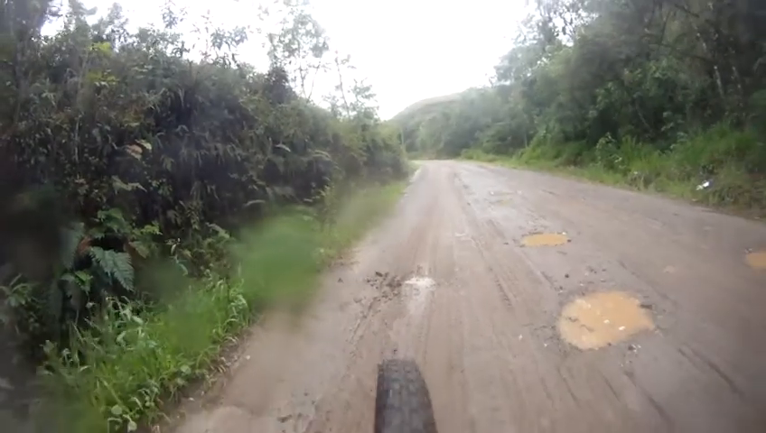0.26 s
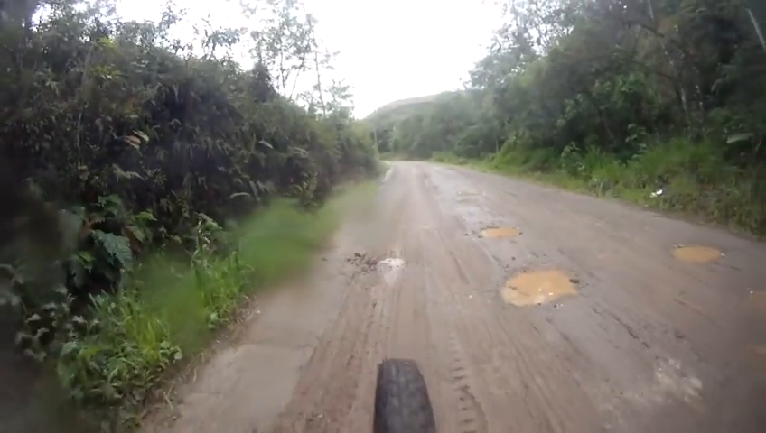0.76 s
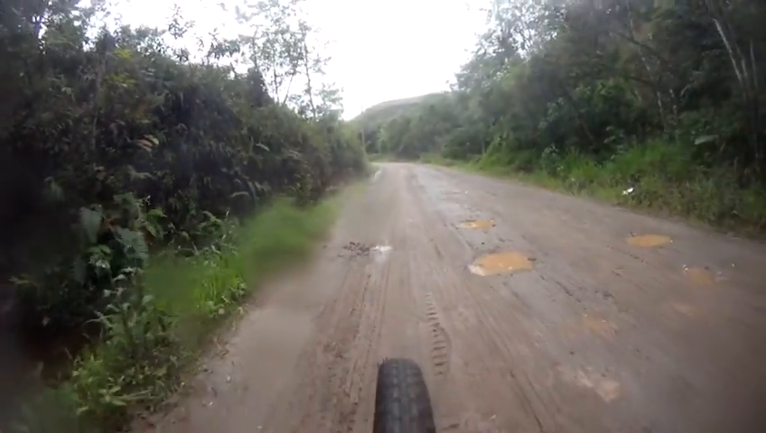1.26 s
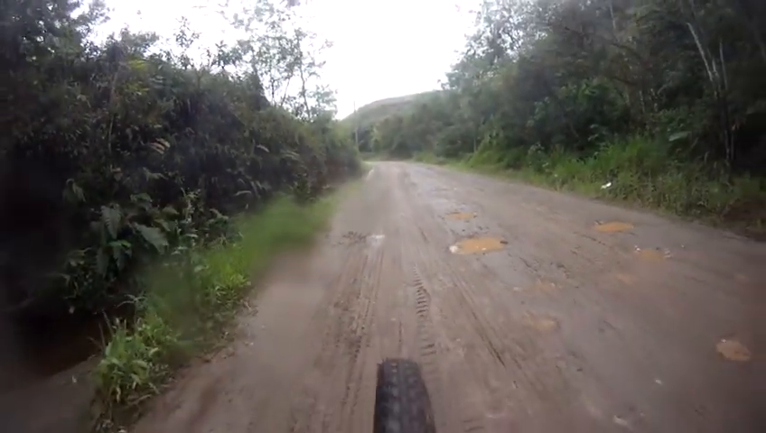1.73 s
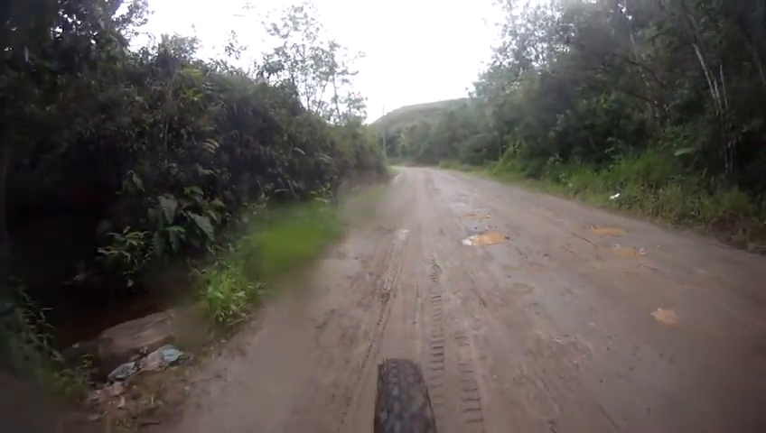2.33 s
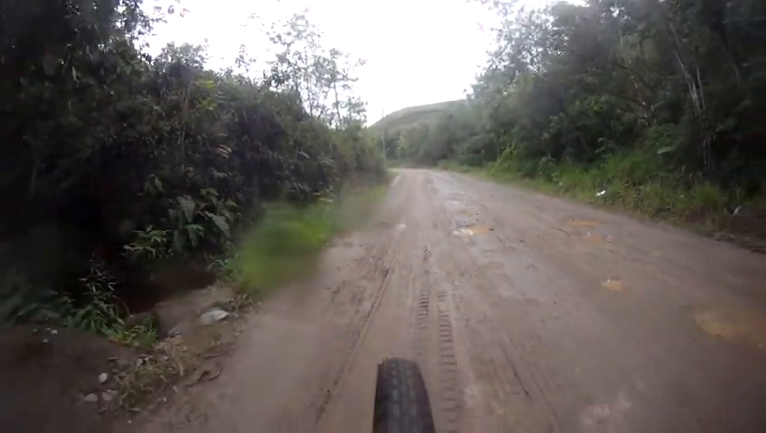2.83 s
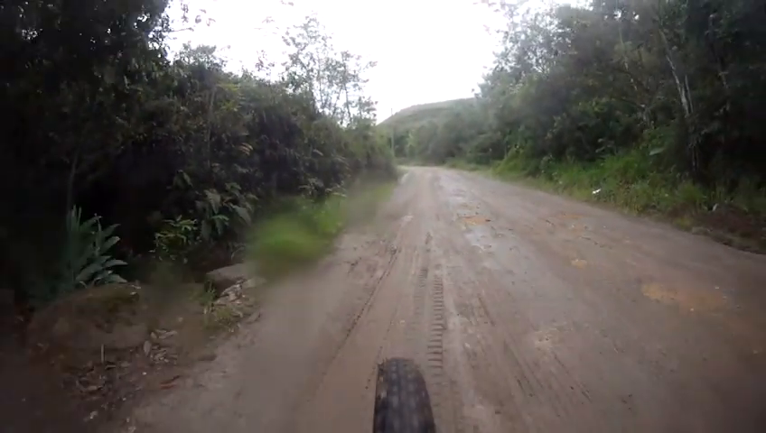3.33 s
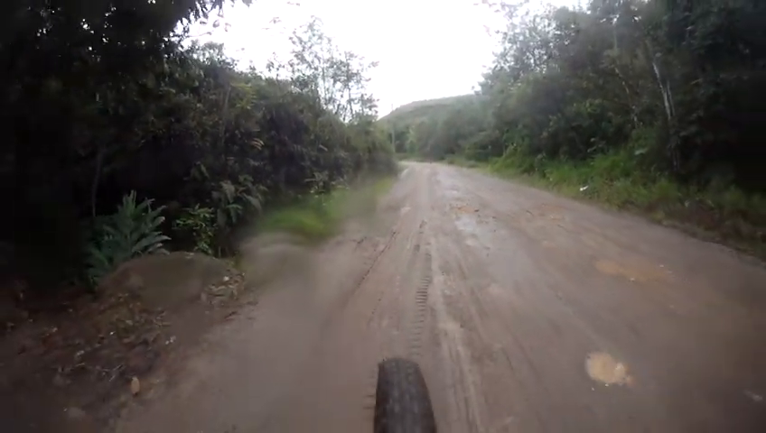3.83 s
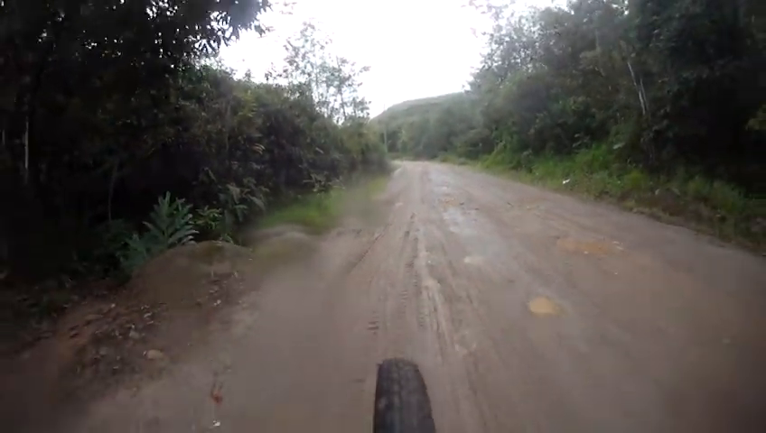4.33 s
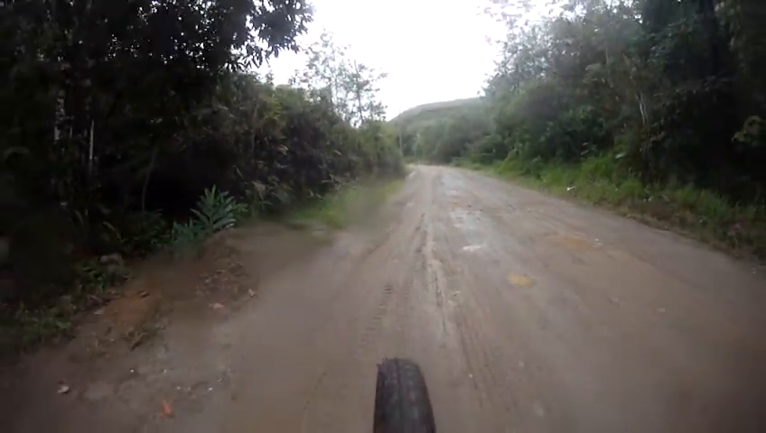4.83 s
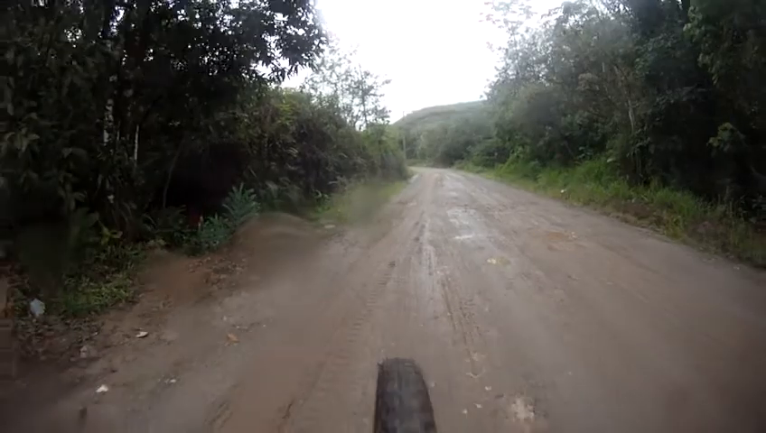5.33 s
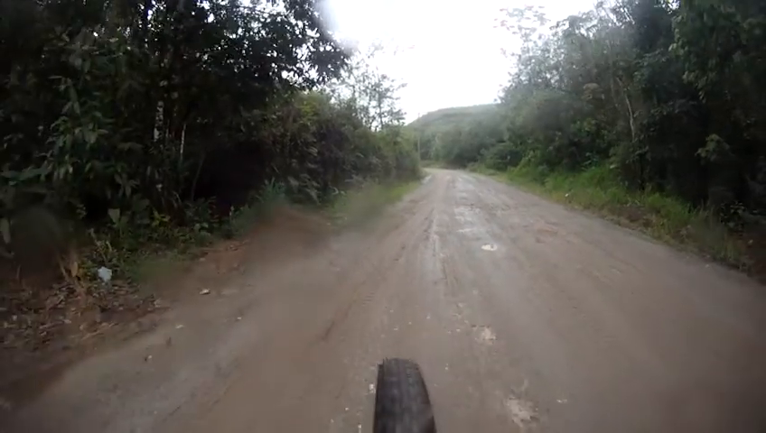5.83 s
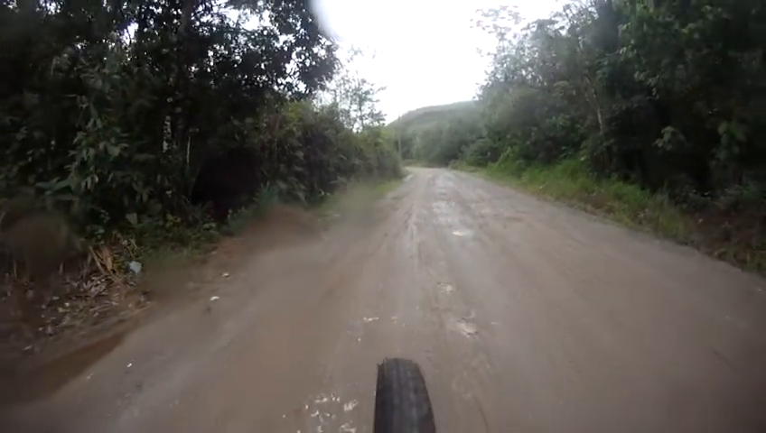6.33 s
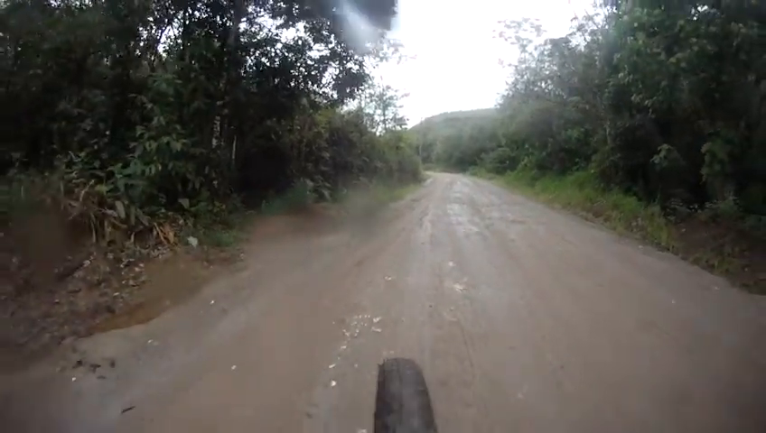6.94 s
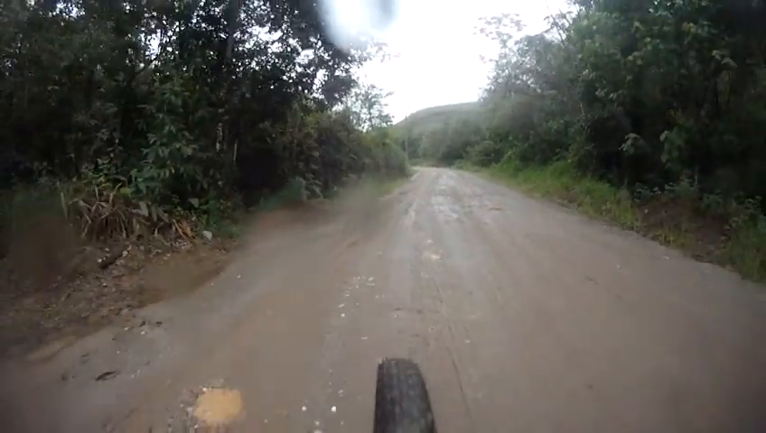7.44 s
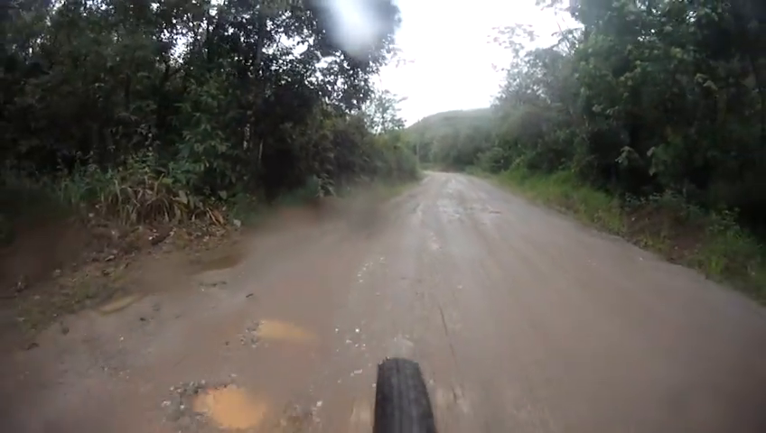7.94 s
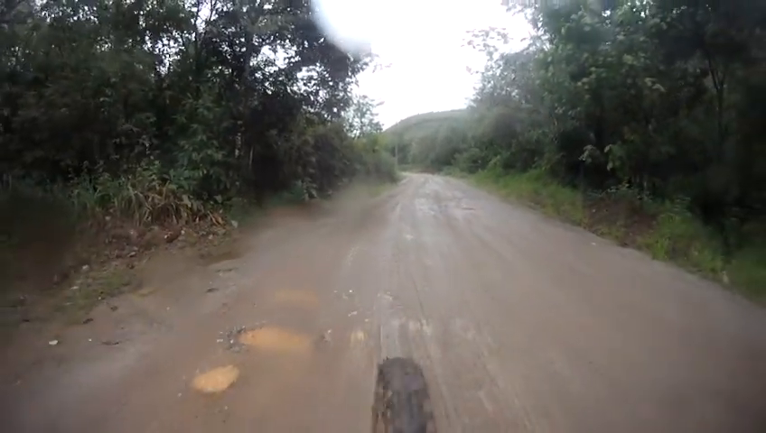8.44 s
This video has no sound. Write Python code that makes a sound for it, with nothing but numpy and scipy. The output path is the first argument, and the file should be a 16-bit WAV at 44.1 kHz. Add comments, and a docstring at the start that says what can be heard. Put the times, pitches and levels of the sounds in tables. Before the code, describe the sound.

Slowed, dull-toned mountain bike ride heard from the frame: deep rumbling, faint gritty hiss, ticking hub, and bumps that grow denser and louder.

```python
"""A low, lumpy rumble runs throughout: a coasting mountain bike on a wet dirt road, slowed down, heard at the frame.
The rumble is noise in low fork and sway resonances; grit hisses and the frame buzzes under pebble hits.
Freewheel ticks, wheel-driven and slightly uneven, and bumps ring the tubes; a loose part clicks and chatters.
The frame groans once, as noise in narrow partials. The slowed sound runs at 12000 samples a second, each
one held in steps, which mirrors the low sound into the treble."""
import sys
import numpy as np
from scipy import signal
from scipy.fft import rfft, irfft
from scipy.io import wavfile
from scipy.ndimage import uniform_filter1d

SR = 44100
rng = np.random.default_rng(int(sys.argv[2]) if len(sys.argv) > 2 else 0)


def pcm_store(signal):
    """Save signal as 16-bit PCM."""
    levels = np.round(np.clip(np.atleast_2d(signal), -1, 1) * 32767)
    wavfile.write(sys.argv[1], SR, levels.astype(np.int16).T)


N = 382788

# the road under the tyres, before chance swings:
# (time [s], fork shake [dB], sway [dB], upper fork ring [dB], frame buzz [dB])
ROAD_SHAKE = [(0, -49, -43, -54, -52), (0.2, -39.5, -45, -48.5, -52.5), (0.38, -45, -53, -54, -49),
              (0.55, -46.5, -45, -48, -48), (0.68, -38.0, -53, -48, -48.5), (0.8, -44.5, -48, -54, -56.5),
              (1.25, -40.5, -45, -48.5, -51.0), (1.65, -45.5, -46.5, -49, -53.5),
              (2.0, -38.5, -44.5, -52.5, -53.5), (2.4, -41, -44, -50.5, -50), (2.7, -44, -48.5, -47.5, -52),
              (3.05, -36, -39.5, -50.0, -45), (3.45, -36, -47.5, -47.5, -50.5),
              (3.8, -40, -40.5, -53.5, -49.5), (4.16, -36.0, -46, -46.5, -52),
              (4.33, -45, -39, -50.5, -56.5), (4.4, -27.5, -34, -38, -54), (4.76, -37.5, -45, -49.5, -56),
              (5.1, -38.5, -42, -45.5, -44.5), (5.3, -31, -42, -44.5, -62), (5.6, -33.5, -40, -41, -47),
              (5.78, -37, -45.0, -49, -50.5), (6.0, -37.5, -45, -46.5, -49.5),
              (6.2, -35.5, -36.5, -46, -58), (6.31, -33, -38, -35, -46), (6.5, -31.5, -35.5, -46.5, -50),
              (6.65, -39, -42, -47.5, -53), (6.77, -34.5, -44, -42, -52),
              (6.93, -41.5, -46.5, -51.5, -51.0), (7.06, -38, -32.5, -39, -49),
              (7.23, -30.0, -43, -39.0, -44.5), (7.74, -41, -38.5, -48.5, -51.0),
              (8.05, -35, -42.5, -41.5, -49), (8.4, -33, -39.5, -42.0, -45), (8.6, -30.5, -32, -31.5, -43),
              (8.68, -32.0, -40.5, -42, -51.0)]
# hard bumps against the frame: (time [s], dull drive [dB], bright drive [dB], favoured dull pitch [Hz])
HARD_KNOCKS = [(0.242, -40.5, -36.5, 580), (0.48, -47, -46, 615), (1.241, -42.5, -56, 400),
               (2.835, -36.5, -61, 530), (2.891, -35.5, -40.5, 647), (2.948, -39.5, -37.5, 637),
               (4.372, -34, -43, 564), (4.384, -29.5, -31, 570), (4.425, -37, -38.5, 553),
               (4.464, -55, -43, 700.0), (4.479, -34, -36.5, 740), (4.554, -34, -52, 726),
               (4.576, -29, -42, 735), (4.646, -35.5, -47.0, 760), (5.179, -31, -34.5, 658),
               (5.21, -46, -38, 760), (5.279, -34.5, -44, 735), (5.316, -34.5, -38, 665),
               (5.382, -32.5, -47, 690), (5.412, -44, -62, 646), (5.44, -32, -37, 773),
               (5.488, -33, -32, 644), (5.549, -37.5, -41.5, 650), (5.637, -34.5, -45, 716),
               (6.076, -34.0, -40, 760), (6.145, -29.5, -37, 665), (6.242, -27, -28.5, 770),
               (6.27, -29.5, -42, 763), (6.282, -57.5, -30, 750.0), (6.307, -32.5, -63, 766),
               (6.357, -30, -33.5, 685), (6.437, -30.5, -40, 733), (6.505, -33, -43.5, 710.0),
               (6.529, -34.5, -50, 758), (6.724, -32, -38, 454), (6.754, -38, -52, 676),
               (7.019, -36, -30.5, 760), (7.04, -29.5, -38, 690), (7.102, -37, -41, 755),
               (7.242, -34.5, -48, 690), (7.255, -35, -43, 690), (7.294, -34, -46, 670),
               (7.333, -35.5, -39.5, 730), (7.376, -33, -48, 655), (7.474, -34.5, -50, 665),
               (7.52, -36.5, -55, 627), (7.579, -36.5, -44, 740), (7.623, -36, -59, 655),
               (7.766, -34.5, -39, 636), (7.944, -33, -42, 730), (7.995, -36, -39.5, 627),
               (8.104, -35, -52, 665), (8.194, -31.5, -34, 654), (8.272, -34, -35, 594),
               (8.347, -33.5, -38.5, 639), (8.434, -34, -47, 704), (8.52, -28.5, -33.5, 705),
               (8.581, -27.5, -40.5, 690), (8.597, -30.5, -43, 648), (8.636, -36, -49, 760),
               (8.647, -41, -59, 770)]
# hard clicks of the loose part: (time [s], drive [dB])
HARD_CLICKS = [(0.2119, -43), (0.2448, -53), (1.15, -40), (1.3683, -45), (1.466, -43), (2.0423, -40.5),
               (2.3351, -42), (2.4945, -44), (2.607, -40), (2.91, -44), (2.9997, -40), (3.0926, -38),
               (3.198, -36), (3.267, -41.5), (3.3812, -45), (3.4186, -47), (3.463, -47), (3.645, -55),
               (3.9723, -37.5), (4.2944, -40), (4.3772, -31.5), (4.6074, -41), (4.8073, -43),
               (4.9742, -39.5), (5.1958, -38.5), (5.382, -41), (5.465, -35.5), (5.4984, -41),
               (5.6062, -54.5), (5.6465, -47.5), (5.6935, -63), (5.7369, -49), (6.118, -37.5),
               (6.2362, -36.5), (6.2721, -26.5), (6.3073, -31), (6.358, -36), (6.3918, -37), (6.5026, -39),
               (6.542, -40), (6.586, -42), (6.6505, -41), (6.6987, -36), (6.9055, -41.5), (6.9618, -41.5),
               (7.0066, -39), (7.0395, -33), (7.1228, -38), (7.1924, -49), (7.2538, -31), (7.3265, -40),
               (7.424, -42), (7.457, -51), (7.4914, -43), (7.5713, -36), (7.6101, -42), (7.7238, -42),
               (7.8034, -35.5), (7.874, -46), (7.9146, -37.5), (7.9564, -40), (7.9927, -39), (8.039, -38),
               (8.2132, -32.5), (8.2856, -32), (8.3202, -42), (8.4302, -30), (8.533, -37), (8.5639, -35),
               (8.6336, -37)]
# wheel speed, picking up as the bike rolls: (time [s], pawl ticks per second [1/s])
WHEEL_SPEED = [(0.0, 6.705), (0.93, 8.348), (1.22, 8.278), (2.11, 9.43), (2.4, 8.488), (3.38, 10.21),
               (4.63, 9.416), (5.11, 10.187), (5.59, 9.923), (6.77, 10.158), (6.99, 9.018), (7.32, 10.479),
               (7.88, 9.846), (8.68, 10.395)]

# low and upper resonances of the fork: (frequency [Hz], width [Hz], gain [dB])
FORK_LOW = [(90.2, 12, -6), (107.2, 26.3, 4.5), (128.1, 23.7, -1.5)]
FORK_RING = [(153.4, 97, -1.5), (197.3, 37, 0), (246, 28.6, -11.5)]
# deep and higher sway of the bike: (frequency [Hz], width [Hz], gain [dB])
DEEP_SWAY = [(25.6, 10.8, 0)]
HIGH_SWAY = [(53.2, 10, 0)]
# dull and bright tones of the frame tubes: (frequency [Hz], width [Hz], gain [dB])
DULL_TUBES = [(299, 64, -1.5), (373.5, 82, 2.5), (562, 63, -9), (627, 66, -1), (758, 118, -3)]
BRIGHT_TUBES = [(1169, 125, -4), (1412, 112, -6), (1647, 131, -8.5), (2083, 230, -7.5), (2208, 125, -8.5),
                (3160, 760, -15)]
# tubes that the rolling knobs keep humming: (frequency [Hz], width [Hz], gain [dB])
HUMMING_TUBES = [(1172, 49, 9), (1390, 120, 4), (2150, 340, -8)]
# ring of the loose part: (frequency [Hz], width [Hz], gain [dB])
LOOSE_PART_RING = [(3160, 135, 3.5), (3100, 50, -18), (3884, 500, 5), (4440, 330, 8), (4750, 370, 2.5)]
# a short groan of the frame: (time [s], level [dB])
GROAN_LEVEL = [(2.48, -64), (2.518, -38), (2.604, -39), (2.68, -68)]
# tones in the groan: (frequency [Hz], width [Hz], gain [dB])
GROAN_TONES = [(287, 23, 1), (327, 32, -3), (404, 53, -20), (699, 19, -20), (1220, 30, -30),
               (1760, 58, -38), (1955, 9.1, -22.5)]
# colour of the tyre hiss on wet grit: (frequency [Hz], relative density [dB per Hz])
GRIT_COLOUR = [(140, -36), (240, -33), (304, -1.5), (707, -8), (958, -13.5), (1200, -13.5), (1830, -21.5),
               (4300, -25.5), (5600, -24.5), (7280, -37), (12300, -120)]

GRIT_DB = -59   # before it follows the buzz
MEAN_RING_DB = -47   # upper fork ring on a mean road
LUMPY_DB = 2.0   # chance surges of the rumble
BUZZ_PATCHY_DB = 1   # chance swing of the buzz
HUM_DB, HUM_FOLLOWS = -64.5, 0.53   # mean level, share of the buzz's swing
FIRST_TICK_S = 0.0128   # before jitter
TICK_DB, TICK_FOLLOWS = -44, 0.085   # drive on a mean road, share of the road's swing
TICK_SPREAD_DB, TICK_JITTER_S = 1.5, 0.0015
# small knocks on a mean road, and their share of the road's swing
SMALL_KNOCKS_PER_S, SMALL_KNOCK_DB, SMALL_BRIGHT_DB, SMALL_KNOCK_FOLLOWS = 3.0, -44.5, -49, 0.72
# light clicks of the loose part; the rate holds at a fork shake of -36.5 dB
SMALL_CLICKS_PER_S, SMALL_CLICK_DB, SMALL_CLICK_SPREAD_DB = 11, -51.5, 2
HELD_RATE = 12000   # samples per second
CUTOFF_HZ = 15950   # edge of the final top cut


def from_db(db):
    """Gain of a level in dB."""
    return 10 ** (np.asarray(db) / 20)


def rms_one(x):
    """Scaled to rms 1."""
    return x / np.sqrt(np.mean(x ** 2) + 1e-20)


def in_time(rows, outside=None):
    """Columns of a curve table, one value a sample."""
    s, *columns = np.transpose(rows)
    t = np.arange(N) / SR
    return [np.interp(t, s, column, outside, outside) for column in columns]


def drift(rate_hz):
    """Slow chance of rms 1: noise through two equal poles, each with its corner at rate_hz."""
    r = np.exp(-80 * np.pi * rate_hz / SR)   # one step every 40 samples
    noise = rng.standard_normal(N // 40 + 2002)
    slow = signal.lfilter([1], [1, -2 * r, r * r], noise)[2000:]
    return np.interp(np.arange(N) / 40, np.arange(len(slow)), rms_one(slow))


def at_random(per_s):
    """Chance moments at a rate that changes in time, each with four numbers of spread 1."""
    draws = rng.random((400, 2))
    luck = rng.standard_normal((400, 4))
    s = draws[:, 0] * (N - 1) / SR
    kept = draws[:, 1] < per_s[(s * SR).astype(int)] * N / SR / len(s)
    return s[kept], luck[kept]


def body(force, modes):
    """Parallel resonances with alternating signs, each peaking at its own gain."""
    out = np.zeros(N)
    for k, (hz, width, db) in enumerate(modes):
        r = np.exp(-np.pi * width / SR)
        a = [1, -2 * r * np.cos(2 * np.pi * hz / SR), r * r]
        b = [(1 - r * r) / 2, 0, (r * r - 1) / 2]
        out += (-1) ** k * from_db(db) * signal.lfilter(b, a, force + 1e-18)
    return out


def contacts(seconds, db, rebound_s, rebound_db, chance):
    """Clicks: each blow and its two rebounds at chance delays and levels."""
    marks = np.zeros(N)
    np.add.at(marks, np.minimum(seconds * SR, N - 1).astype(int), from_db(db))
    for k in (0, 1):
        later = seconds + rebound_s * (k + 0.405 + chance[:, k])
        later_db = db + rebound_db - 12.3 * chance[:, k + 2]
        np.add.at(marks, np.minimum(later * SR, N - 1).astype(int), from_db(later_db))
    return marks + 1e-18


def shudder(marks, rise_s, tail_s):
    """Noise that swells and dies after each click."""
    r, q = np.exp(-1 / (rise_s * SR)), np.exp(-1 / (tail_s * SR))
    swell = signal.lfilter([1 - r], np.convolve([1, -q], [1, -r]), marks)
    return swell * rng.standard_normal(N)


def struck(seconds, db, modes, damping, swell, spread_db, stagger_s, rebound_s, rebound_db, favoured_hz=None):
    """Each blow rings each mode with a strength and start of its own; a second resonance rounds the onset."""
    out, chance = np.zeros(N), rng.random((len(seconds), 4))
    luck = rng.standard_normal((len(seconds), len(modes)))
    late = rng.random((len(seconds), len(modes)))
    for k, (hz, width, mode_db) in enumerate(modes):
        strength_db = db + spread_db * luck[:, k]
        if favoured_hz is not None:   # where the blow lands decides which modes speak
            octaves_off = np.abs(np.log2(hz / favoured_hz))
            strength_db = strength_db - 12.7 * np.minimum(octaves_off / 0.14, 1)
        start = np.minimum(seconds + stagger_s * late[:, k], (N - 1) / SR)
        marks = contacts(start, strength_db, rebound_s, rebound_db, chance) * SR / (np.pi * width)
        ring = body(marks, [(hz, damping * width, mode_db)])
        out += (-1) ** k * body(ring, [(hz, swell * width, 0)])
    return out


def pebbles(per_s, spread_db):
    """Force of many small hits, as of stones and mud lumps under the knobs; rms 1."""
    sizes = from_db(spread_db * np.minimum(rng.exponential(1, N), 4)) * rng.choice([-1, 1], N)
    hit = rng.random(N) < per_s * from_db(3 * drift(15)) / SR
    return rms_one(sizes * hit)


def grit(buzz_db):
    """Hiss of the tyres: coloured noise, a little louder where the road is rougher."""
    hz = np.fft.rfftfreq(N, 1 / SR) + 1
    point_hz, point_db = np.transpose(GRIT_COLOUR)
    colour = from_db(np.interp(np.log(hz), np.log(point_hz), point_db, -90, -90))
    hiss = rms_one(irfft(rfft(rng.standard_normal(N)) * colour, N))
    return from_db(GRIT_DB + 0.15 * (buzz_db + 55.5) + 1.9 * drift(39)) * hiss


def groan():
    """Noise twice through narrow partials gives wavering tones."""
    level_db, = in_time(GROAN_LEVEL, outside=-120)
    narrow = body(rng.standard_normal(N), GROAN_TONES)
    tone = body(narrow, [(hz, 3 * width, 0) for hz, width, _ in GROAN_TONES])
    return uniform_filter1d(from_db(level_db), 300) * rms_one(tone)


def tube_hum(buzz_db):
    """Noise from the rolling knobs keeps tube resonances humming, partly following the buzz."""
    tone = body(body(rng.standard_normal(N), HUMMING_TUBES), [(1450, 2500, 0)])
    level_db = HUM_DB + HUM_FOLLOWS * (buzz_db - buzz_db.mean()) + 2.0 * drift(28)
    return from_db(level_db) * rms_one(tone)


def rattle(shake_db):
    """The loose part clicks hard on jolts and chatters on as it settles."""
    light_s, luck = at_random(SMALL_CLICKS_PER_S * from_db(1.1 * (shake_db + 36.5)))
    light_db = SMALL_CLICK_DB + SMALL_CLICK_SPREAD_DB * luck[:, 0]
    s, db = np.hstack([np.transpose(HARD_CLICKS), [light_s, light_db]])
    marks = contacts(s, db, 0.0045, -11.0, rng.random((len(s), 4)))
    hits = from_db(14) * shudder(marks, 0.00065, 0.00024)
    hits += from_db(1.5) * shudder(marks, 0.0013, 0.0011)
    # dies away after each jolt
    settling = signal.lfilter([1], [1, -np.exp(-1 / (0.037 * SR))], np.sqrt(marks))
    chatter_gain = from_db(-42.5) * settling + from_db(-72.5 + 0.5 * (shake_db + 44))
    chatter = chatter_gain * pebbles(300, 9.4)
    low_cut = signal.butter(2, 2300, "high", fs=SR, output="sos")
    return signal.sosfilt(low_cut, body(hits + chatter, LOOSE_PART_RING))


def freewheel(rough_db):
    """Times and drives of the ticks: one for every pawl that passes, a little harder on a rough road."""
    per_s, = in_time(WHEEL_SPEED)
    passed = np.cumsum(per_s) / SR
    passed = passed - passed[int(FIRST_TICK_S * SR)]
    s = np.interp(np.arange(int(passed[-1]) + 1), passed, np.arange(N) / SR)
    luck = rng.standard_normal((len(s), 2))
    db = TICK_DB + TICK_FOLLOWS * rough_db[(s * SR).astype(int)] + TICK_SPREAD_DB * luck[:, 0]
    return np.clip(s + TICK_JITTER_S * luck[:, 1], 0, (N - 1) / SR), db


def bumps(rough_db):
    """The hard knocks, and small ones at random that come faster and louder on a rough road."""
    s, luck = at_random(SMALL_KNOCKS_PER_S * from_db(rough_db))
    here_db = SMALL_KNOCK_FOLLOWS * rough_db[(s * SR).astype(int)]
    dull_db = SMALL_KNOCK_DB + here_db + 1.0 * luck[:, 0]
    bright_db = SMALL_BRIGHT_DB + here_db + 2.95 * luck[:, 1]
    favoured_hz = 660 + 60 * luck[:, 2]
    return np.hstack([np.transpose(HARD_KNOCKS), [s, dull_db, bright_db, favoured_hz]])


def frame(buzz_db, rough_db):
    """Road buzz, freewheel ticks and knocks all ring the same tubes; knocks also thump the fork."""
    s, dull_db, bright_db, favoured_hz = bumps(rough_db)
    tick_s, tick_db = freewheel(rough_db)
    # clear ringing of each blow
    knocks = from_db(2.5) * struck(s + 0.00201, dull_db, DULL_TUBES, 1.3, 1.92, 2.15, 0.003966,
                                   0.009, -3, favoured_hz)
    knocks += from_db(-6) * struck(s, bright_db, BRIGHT_TUBES, 1.55, 1.83, 3.5, 0.00319, 0.0045, -1.4)
    knocks += from_db(-7.5) * struck(s, dull_db, FORK_LOW + FORK_RING, 1.57, 3.7, 3.2, 0.00798, 0.022, -9.5)
    ticks = from_db(-3.5) * struck(tick_s, tick_db, BRIGHT_TUBES, 1.4, 2.7, 1.5, 0.00196, 0.0038, -1)
    ticks += from_db(-9.0) * struck(tick_s, tick_db, DULL_TUBES, 2.53, 3.1, 1.84, 0.00285, 0.00482, -0.9)
    # rough forces that shake the tubes: stones, and the noisy side of each blow
    chance = rng.random((len(s), 4))
    tick_chance = rng.random((len(tick_s), 4))
    stones = pebbles(1500, 7.1)
    dull = from_db(buzz_db + 8.5) * stones
    dull += from_db(9) * shudder(contacts(s, dull_db, 0.0227, -2.7, chance), 0.002, 0.014)
    bright = from_db(buzz_db) * stones
    bright += from_db(-5) * shudder(contacts(s, bright_db, 0.0234, 13, chance), 0.00087, 0.005)
    tick_marks = contacts(tick_s, tick_db, 0.0073, -11, tick_chance)
    bright += from_db(11.5) * shudder(tick_marks, 0.00053, 0.0059)
    low_cut = signal.butter(2, 210, "high", fs=SR, output="sos")
    shaken_tubes = signal.sosfilt(low_cut, body(dull, DULL_TUBES) + body(bright, BRIGHT_TUBES))
    return knocks + ticks + tube_hum(buzz_db) + shaken_tubes


def shaken(modes, steadiness, over_s):
    """Road noise in steep low resonances; the chance swings of the narrow noise are partly evened out."""
    x = np.zeros(N)
    for hz, width, db in modes:
        once = body(rng.standard_normal(N), [(hz, width, db)])
        x += body(once, [(hz, 1.13 * width, 0)])
    x = rms_one(x)
    swing = np.sqrt(uniform_filter1d(x ** 2, int(over_s * SR)) + 0.025)
    return rms_one(x / swing ** np.clip(steadiness, 0, 1))


def rumble(shake_db, sway_db, upper_db):
    """The road shakes the bike's slow sway and the low and upper resonances of the fork."""
    sway = from_db(-4.0) * shaken(DEEP_SWAY, 0.35, 0.17)
    sway += from_db(-1.5) * shaken(HIGH_SWAY, 0.38, 0.21)
    fork = from_db(shake_db) * shaken(FORK_LOW, 0.36, 0.089)
    fork += from_db(upper_db) * shaken(FORK_RING, 0.15, 0.08)
    return from_db(sway_db) * sway + fork


def scene():
    """Everything reaches one microphone through its clamp on the frame."""
    shake_db, sway_db, upper_db, buzz_db = in_time(ROAD_SHAKE)
    shake_db = shake_db + LUMPY_DB * drift(3.6)
    sway_db = sway_db + LUMPY_DB * drift(4)
    rough_db = upper_db - MEAN_RING_DB
    buzz_db = buzz_db + BUZZ_PATCHY_DB * drift(8.1)
    background = grit(buzz_db) + groan() + rattle(shake_db)
    bike = frame(buzz_db, rough_db) + rumble(shake_db, sway_db, upper_db)
    return (background + bike)[None]


def record(dry):
    """The top fades before half the held rate; every sample is held in steps, then the top is cut."""
    dull = signal.sosfilt(signal.butter(6, 5200, fs=SR, output="sos"), dry)
    coarse = signal.resample_poly(dull, HELD_RATE, SR, axis=1)
    steps = np.repeat(coarse, 4, axis=1)
    held = signal.resample_poly(steps, SR, 4 * HELD_RATE, axis=1)[:, :N]
    return signal.sosfilt(signal.cheby2(14, 60, CUTOFF_HZ, fs=SR, output="sos"), held)


dry = scene()
out = record(dry)
pcm_store(out)
```